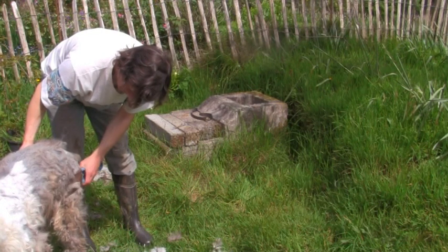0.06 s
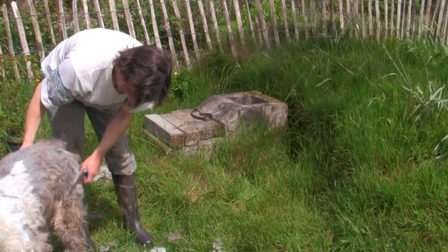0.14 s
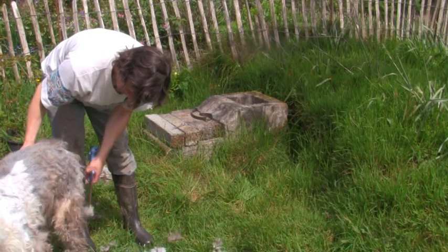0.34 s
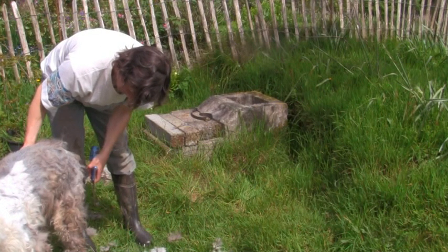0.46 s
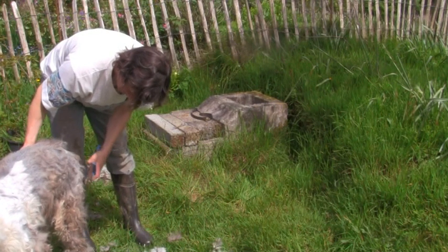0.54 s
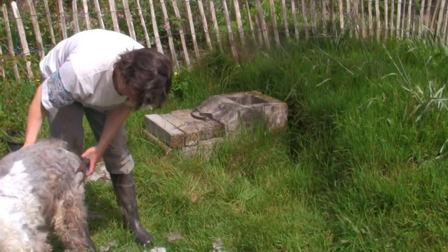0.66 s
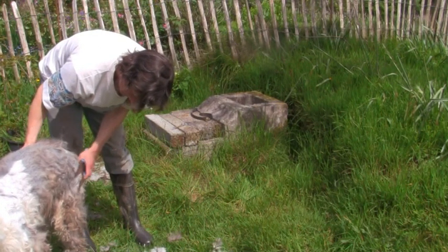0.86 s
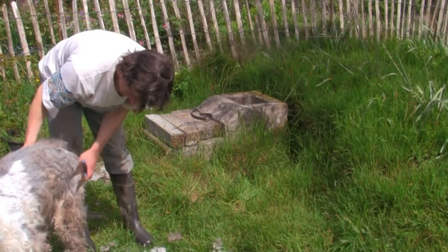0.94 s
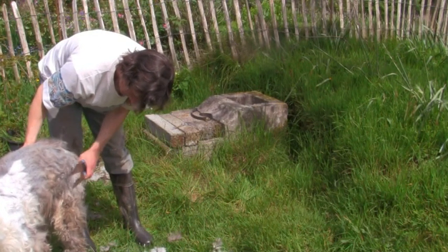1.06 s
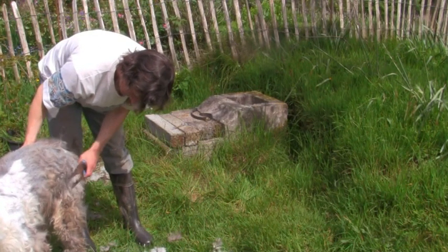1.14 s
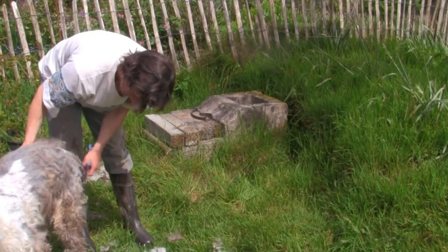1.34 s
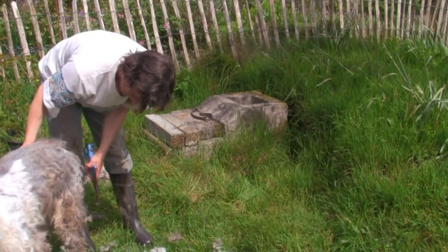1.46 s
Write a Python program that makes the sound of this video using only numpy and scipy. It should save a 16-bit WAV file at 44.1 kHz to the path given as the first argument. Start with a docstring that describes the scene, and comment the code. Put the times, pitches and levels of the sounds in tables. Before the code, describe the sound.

Hand shears scrape through a thick animal coat and snap shut twice, birds chirping faintly.

```python
"""In a garden, sprung steel hand shears work through a thick coat. The blades grind along each
other, which makes the steel ring and the hair hiss, and twice they snap shut with a crack.
A bird chatters to the right in quick falling notes, and another whistles faint glides.
A breeze bumps the microphone over a soft outdoor hush."""
import sys
import numpy as np
from scipy import signal
from scipy.fft import rfft, irfft, next_fast_len
from scipy.io import wavfile
from scipy.ndimage import map_coordinates

SR = 44100
rng = np.random.default_rng(int(sys.argv[2]) if len(sys.argv) > 2 else 0)


def put_to_file(sound):
    """Save the sound as 16-bit audio at rate SR, in the file named by the first command-line argument."""
    columns = np.atleast_2d(sound).T  # one column per channel
    safe = np.clip(columns, -1, 1)
    whole_steps = np.round(safe * 32767)
    wavfile.write(sys.argv[1], SR, whole_steps.astype(np.int16))


N = 66150
T = np.arange(N) / SR


def amp(db):
    """Turn decibels into a number to multiply by."""
    return 10 ** (np.asarray(db) / 20)


def along(points, hz):
    """Read between (pitch_hz, value) points, with octaves evenly spaced."""
    pitches, values = np.transpose(points)
    return np.interp(np.log(hz + 1), np.log(pitches + 1), values)


def wobble(per_s):
    """A smooth random curve through per_s points a second."""
    return map_coordinates(rng.standard_normal(int(N * 400 / SR) + 4), [T * min(per_s, 399)])


def filtered(x, response):
    """Turn each frequency of x up or down as response says."""
    size = next_fast_len(N + SR // 2)
    return irfft(rfft(x, size) * response(np.fft.rfftfreq(size, 1 / SR)), size)[..., :N]


def resonance(hz, width, db):
    """A filter that rings around one pitch; the narrower it is, the longer it rings."""
    gain = amp(db) * np.sqrt(SR / width / np.pi)
    return lambda f: gain * 1j * f * width / (hz * hz - f * f + 1j * f * width)


def coloured(x, colour):
    """Give x a tone colour without letting any sound come early (a minimum-phase filter)."""
    cepstrum = irfft(np.log(amp(along(colour, np.fft.rfftfreq(2048, 1 / SR))) + 1e-6))
    forward_only = np.r_[1, np.full(1023, 2), 1, np.zeros(1023)]
    impulse = irfft(np.exp(rfft(cepstrum * forward_only)))
    return signal.fftconvolve(x, impulse / np.linalg.norm(impulse))[:N]


def pan(x, left_db):
    """Place a sound to the left, or to the right if left_db is negative."""
    return x * amp([[left_db / 2], [-left_db / 2]])


def stereo_noise(colour, likeness):
    """Coloured noise; likeness 1 makes left and right the same, -1 makes them opposite."""
    def response(hz):
        angle = np.arccos(np.clip(along(likeness, hz), -1, 1)) / 2
        return amp(along(colour, hz)) * [np.cos(angle), np.sin(angle)]
    mid, side = filtered(rng.standard_normal((2, N)), response)
    return np.array([mid + side, mid - side]) / np.std(mid)


# How long the garden's echo takes to fade by 60 dB: pitch_hz, fade_s
ECHO_FADES = [(500, 0.16), (2000, 0.3), (6000, 0.18), (12000, 0.14)]

def echoes(x, delay_s=0.006):
    """Ground and fence scatter a short tail back, each pitch dying at its own speed."""
    hz, t, noise = signal.stft(rng.standard_normal((2, SR // 3)), SR, nperseg=128)
    fade = amp(-60 * t / along(ECHO_FADES, hz)[:, None])
    tail = signal.istft(noise * fade, SR, nperseg=128)[1]
    delayed = np.pad(x, (int(delay_s * SR), 0))
    return signal.fftconvolve(delayed[None], tail / np.linalg.norm(tail[0]), axes=1)[:, :N]


# The tones the blades ring at: pitch_hz, width_hz, level_db
STEEL_TONES = [(1418, 45, -0.5), (1940, 190, 0.5), (2409, 80, -3), (2482, 55, -1.5), (2620, 250, 2.5),
               (3060, 120, -4), (3366, 37, -1), (3815, 61, -5), (4260, 250, -5.5), (4900, 250, -3),
               (5170, 130, -2), (5577, 67, -8), (5960, 22, -12), (6280, 210, -2), (7830, 42, -9.5),
               (7570, 93.6, -8), (8410, 85, -2), (8940, 49, -14), (9660, 160, -8), (9900, 250, -5),
               (11160, 520, -12.5), (12500, 400, -13.5)]

def steel_ring(force, low_db, middle_db, drift_db, low_cut_hz=730, high_cut_hz=12600):
    """A force rings every tone of the steel; each one's share drifts as the contact point slides."""
    tones = 0
    for hz, width, db in STEEL_TONES:
        share_db = low_db if hz < 2550 else middle_db if hz < 4500 else 0
        push = force * rng.standard_normal(N) * amp(share_db + drift_db * wobble(40))
        tones += filtered(push, resonance(hz, width, db - 10))
    soften_highs = lambda f: 1 / (1 + 1j * f / high_cut_hz - (f / high_cut_hz) ** 2) ** 3
    soften_lows = lambda f: 1 / (1 + low_cut_hz / (1j * f + 1)) ** 2
    return filtered(tones, lambda f: soften_highs(f) * soften_lows(f))


# How hard the blades rub, one list for each stroke: time_s, level_db
STROKES = [
    [(0, -74.5), (.014, -67.5), (.026, -58.5), (.032, -63), (.042, -76), (.051, -54.5), (.056, -84),
     (.061, -63), (.07, -60.5), (.08, -56.5), (.088, -80), (.11, -99.5)],
    [(.11, -98), (.15, -72), (.16, -82), (.186, -77), (.195, -55.5), (.203, -40), (.2095, -31.5)],
    [(.27, -75), (.32, -83.5), (.38, -82), (.395, -65.5), (.402, -79), (.405, -56.5), (.414, -59.5),
     (.431, -73.5), (.451, -70.5), (.5, -87.5), (.59, -90.5)],
    [(1.08, -87.5), (1.1, -73.5), (1.132, -71), (1.141, -79.5), (1.156, -64.5), (1.166, -67.5),
     (1.18, -58.5), (1.192, -62.5), (1.205, -59.5), (1.219, -72), (1.231, -54.5), (1.244, -74),
     (1.251, -57), (1.265, -70), (1.276, -55), (1.283, -55), (1.293, -38)],
    [(1.47, -99), (1.49, -53.5), (1.5, -53)],
]
# How freely the hand's grip lets the steel ring: start_s, low_tones_db, middle_tones_db
HAND_GRIP = [(0, -1.5, -4), (0.11, -12.5, -7), (0.371, -12, -3), (0.404, -3.5, 4), (.43, 10.5, 5),
             (.52, -4, 2.5), (1.072, -9.5, -5), (1.191, -8.5, -8.5), (1.274, -24, 9.5), (1.282, -17, 0),
             (1.4, -8, 2)]
# The tone colour of hissing hair: pitch_hz, level_db
HAIR_COLOUR = [(530, -40.5), (900, -13.5), (1450, -8.5), (1640, -8.5), (4490, -0.5), (5030, 3),
               (8670, -9.5), (13200, -24)]

def blade_grind(edge_s=0.002, judder_db=2, hair_db=-7):
    """Blade slides on blade and through hair: rough rubbing rings the steel over a hiss of fibres."""
    rub = np.zeros(N)
    for stroke in STROKES:
        times, levels = np.transpose(stroke)
        gate = np.clip(np.minimum(T - times[0], times[-1] - T) / edge_s + 0.5, 0, 1)
        rub += gate * amp(np.interp(T, times, levels))
    rub *= amp(judder_db * wobble(160))
    starts, low_db, middle_db = np.transpose(HAND_GRIP)
    grip = np.clip(np.searchsorted(starts, T) - 1, 0, None)
    hiss = coloured(rub * rng.standard_normal(N), HAIR_COLOUR)
    return steel_ring(rub, low_db[grip], middle_db[grip], drift_db=3.5) + amp(hair_db) * hiss


# How hard the breeze blows: time_s, level_db
GUSTS = [(0.0, -71), (0.062, -96.5), (0.112, -75.5), (0.456, -81), (0.476, -57), (0.542, -81.5),
         (0.604, -65), (0.634, -77), (0.7, -70.5), (0.788, -78), (0.934, -72), (0.994, -49), (1.052, -64.5),
         (1.168, -73.5), (1.26, -69), (1.29, -93), (1.336, -56.5), (1.37, -63.5), (1.42, -55.5),
         (1.444, -81), (1.5, -72)]
# The tone colour of its rumble: pitch_hz, level_db
RUMBLE_COLOUR = [(20, -15.5), (39, -1), (61, 2), (168, -7), (231, -25), (300, -22.5), (390, -54),
                 (660, -120)]

def breeze(lump_db=1.5):
    """Lumpy wind bumps the microphone and makes a low rumble."""
    gust = amp(np.interp(T, *np.transpose(GUSTS)) + lump_db * wobble(29))
    rumble = stereo_noise(RUMBLE_COLOUR, likeness=[(40, 0.9), (150, 0.4)])
    return pan(gust * rumble, left_db=2.5)


# The tone colour of the outdoor background: pitch_hz, level_db
HUSH_COLOUR = [(88, -31.5), (150, -15.5), (307, -13.5), (384, -16.5), (464, -16), (743, -17.5), (914, -19),
               (2210, -31), (2430, -37), (2770, -31), (13500, -46.5)]
# How alike it is on the left and right: pitch_hz, likeness (-1 to 1)
HUSH_LIKENESS = [(60, 0.58), (180, 0.044), (520, -0.18), (1510, 0.421), (4440, -0.398), (13000, -0.22)]

def garden_hush(level_db=-72.5):
    """The soft, steady hush of the open air."""
    return pan(amp(level_db) * stereo_noise(HUSH_COLOUR, HUSH_LIKENESS), left_db=-2.5)


# Moments when one steel tone sings out of the grind, plus one low 520 Hz tone for the spring's knock at the
# first snap: start_s, length_s, pitch_hz, level_db
SQUEAKS = [(.024, .008, 1455, -60), (.018, .025, 2450, -65), (.022, .012, 8800, -65),
           (.068, .012, 8750, -60), (.074, .01, 2300, -65), (.045, .045, 5550, -69), (.045, .04, 4850, -69),
           (.212, .008, 3360, -46), (.213, .008, 1148, -54), (.214, .006, 520, -60),
           (.389, .012, 5150, -70), (.41, .015, 8200, -66), (.442, .03, 1460, -68), (.452, .025, 9650, -74),
           (.448, .012, 2590, -66), (1.169, .018, 4955, -60), (1.194, .014, 4940, -63),
           (1.182, .026, 6240, -66), (1.203, .006, 2070, -66), (1.223, .013, 5545, -65),
           (1.249, .007, 5150, -66), (1.27, .009, 6180, -56), (1.272, .006, 8950, -56),
           (1.284, .012, 4960, -49), (1.294, .008, 1141, -60), (1.2935, .006, 8400, -36),
           (1.294, .003, 10500, -44), (1.294, .005, 6210, -34)]

def steel_squeaks(waver_db=3):
    """One tone swells while the rubbing feeds it, then dies away; lower tones last longer."""
    out = np.zeros(N)
    for start, length, hz, db in SQUEAKS:
        rise = np.clip((T - start) / min(0.006, length / 2), 0, 1)
        fade_s = 160 / np.sqrt(hz * 3000)  # 160 cycles at 3000 Hz
        level = amp(db - 60 * np.clip(T - start - length, 0, 1) / fade_s)
        waver = amp(waver_db * wobble(150))
        tone = np.sqrt(2) * np.sin(2 * np.pi * hz * T + 1.1 * wobble(150))
        out += rise * level * waver * tone
    return out


# The chattering bird's notes: start_s, level_db
CHIRPS = [(0.105, -59), (0.162, -63.5), (0.3435, -58), (0.384, -57), (0.421, -61.5), (0.5253, -58.5),
          (0.5643, -59.5), (0.6051, -59), (0.6442, -59.5), (0.7042, -62.5), (0.7434, -57.5),
          (0.7823, -57.5), (0.821, -59.5), (0.8826, -56.5), (0.9239, -63), (0.9637, -60.5), (1.005, -59)]

def bird_chatter(top_hz=2500, end_hz=1780, fall_s=0.0015, rise_s=0.002, fade_s=0.012, echo_db=-10):
    """A bird calls in quick runs of short notes, each dropping steeply in pitch."""
    out = np.zeros(N + SR)
    t = np.arange(SR // 20) / SR
    for (start, db), tuning in zip(CHIRPS, rng.normal(1, 0.01427, len(CHIRPS))):
        hz = tuning * (end_hz + (top_hz - end_hz) * np.exp(-t / fall_s))
        level = amp(db + 8 - 60 * t / fade_s) * (1 - np.exp(-t / rise_s))
        out[round(start * SR):][:len(t)] += level * np.sin(2 * np.pi * np.cumsum(hz) / SR)
    out += amp(-7) * np.roll(out, round(0.0034 * SR))  # a near wall repeats each note
    return pan(out[:N], left_db=-3) + amp(echo_db) * echoes(out[:N])


# Each hit of blade on blade in the two snaps: start_s, level_db, fade_s (time to drop 60 dB)
BLADE_HITS = [(0.2108, -15.5, 0.012), (0.2096, -25, 0.024), (0.2125, -19.5, .012), (0.216, -23.5, 0.0077),
              (0.22, -30.5, 0.022), (.231, -49.5, 0.078), (1.294, -25.5, 0.013), (1.2946, -28, 0.014),
              (1.2985, -28.5, 0.0031), (1.303, -39, 0.018), (1.3095, -50, 0.081)]
# The tone colour of the crack: pitch_hz, level_db
CRACK_COLOUR = [(150, -44.5), (250, -35.5), (530, -17), (860, -25.5), (1520, -19), (1950, -3), (3050, -19),
                (3320, -12.5), (3860, -15.5), (5380, -11), (9500, 1.5), (10900, -21), (13200, -28)]

def blade_snaps(click_db=8.5, ring_db=-6.5):
    """The blades slam shut in a few quick hits: a crack, ringing steel and a knock in the spring."""
    force = np.zeros(N)
    for start, db, fade_s in BLADE_HITS:
        force += (T >= start) * amp(db - 60 * np.clip(T - start, 0, 1) / fade_s)
    clicks = amp(click_db) * np.clip(np.diff(force, prepend=0), 0, None)  # each hit's first touch
    grit = force * np.sign(rng.standard_normal(N))
    crack = coloured(clicks + grit, CRACK_COLOUR)
    ring = steel_ring(force, low_db=-15, middle_db=-7.5, drift_db=0.59)
    spring = resonance(hz=556, width=160, db=-25.5)
    knock = filtered(force, lambda f: spring(f) ** 2)
    return crack + amp(ring_db) * ring + knock


# The far bird's whistles: start_s, length_s, first_hz, middle_hz, last_hz, level_db
WHISTLES = [(0.538, 0.052, 3510, 3950, 4300, -83), (0.621, .034, 4300, 3700, 2600, -84),
            (0.67, 0.024, 3740, 3670, 3040, -85), (0.694, 0.02, 3450, 3100, 2860, -80),
            (0.737, 0.0086, 5300, 4560, 4130, -79.5), (.773, 0.024, 3850, 3765, 3650, -79.5),
            (0.801, .02, 3800, 3680, 3640, -82), (0.82, 0.025, 3924, 4500, 5200, -84),
            (0.942, 0.035, 3890, 3895, 4320, -79.5), (.972, 0.011, 4300, 4130, 3670, -80)]

def bird_song(waver_db=4, echo_db=-9):
    """A second bird whistles thin, sliding notes from far off."""
    out = np.zeros(N)
    for start, length, first_hz, middle_hz, last_hz, db in WHISTLES:
        progress = np.clip((T - start) / length, 0, 1)
        hz = np.interp(progress, [0, 0.5, 1], [first_hz, middle_hz, last_hz])
        swell = np.sqrt(np.abs(np.sin(np.pi * progress))) * (progress < 1)
        level = amp(db + waver_db * wobble(89.9))
        out += level * swell * np.sin(2 * np.pi * np.cumsum(hz) / SR)
    return pan(out, left_db=-1.3) + amp(echo_db) * echoes(out)


def scene(shears_top_hz=13500, width_db=-17.5, smear_s=0.001, echo_db=-19.5, echo_top_hz=9100):
    """The shears and their echo, mixed with the two birds, the breeze and the hush."""
    shears = blade_grind() + steel_squeaks() + blade_snaps()
    shears = filtered(shears, lambda f: 1 / (1 + (f / shears_top_hz) ** 30))
    # A smeared copy, added on the left and taken away on the right, makes the shears sound wider.
    smear = rng.standard_normal(400) * np.exp(-np.arange(400) / SR / smear_s)
    side = amp(width_db) * signal.fftconvolve(shears, smear / np.linalg.norm(smear))[:N]
    dulled = filtered(shears, lambda f: 1 / (1 + 1j * f / echo_top_hz))
    placed = pan(shears, left_db=-0.6) + [side, -side] + amp(echo_db) * echoes(dulled)
    return placed + bird_chatter() + bird_song() + breeze() + garden_hush()


def record(dry, top_hz=15750):
    """Cut away the very highest treble."""
    return filtered(dry, lambda hz: hz < top_hz)


dry = scene()
out = record(dry)
put_to_file(out)
```